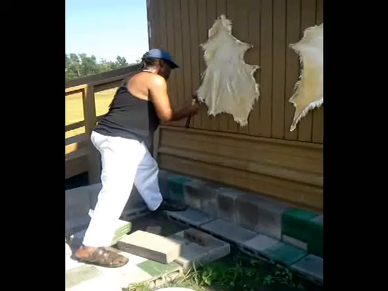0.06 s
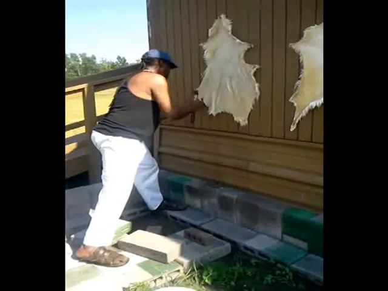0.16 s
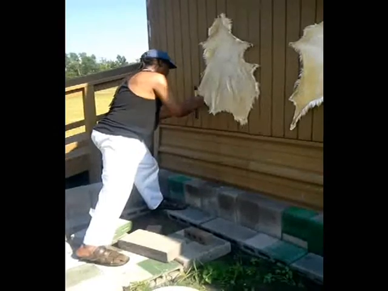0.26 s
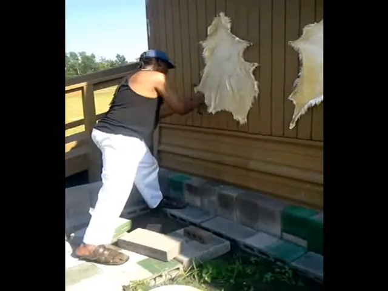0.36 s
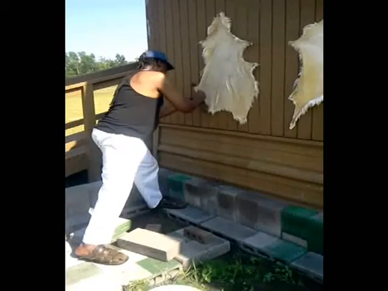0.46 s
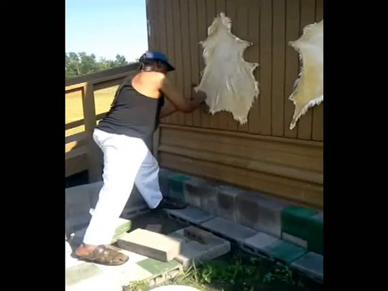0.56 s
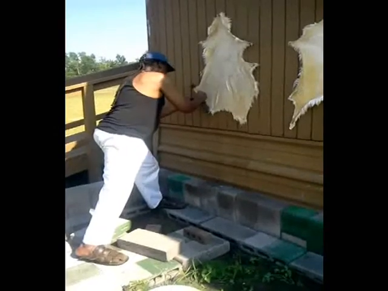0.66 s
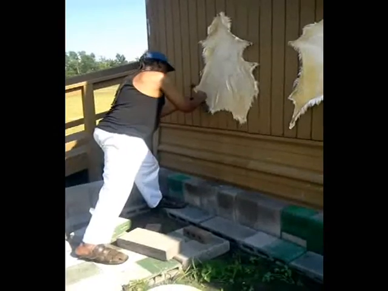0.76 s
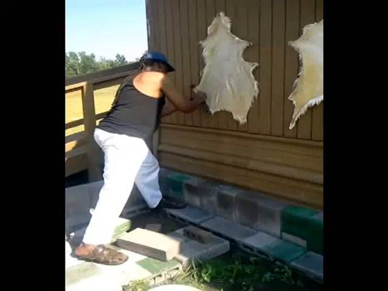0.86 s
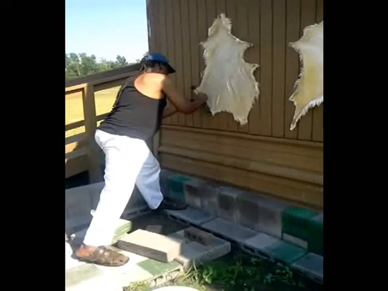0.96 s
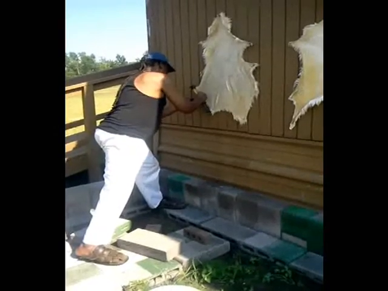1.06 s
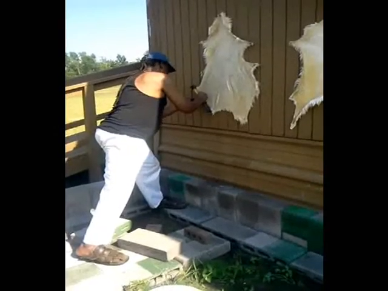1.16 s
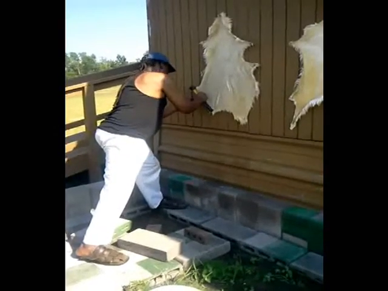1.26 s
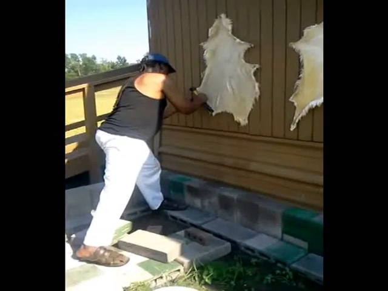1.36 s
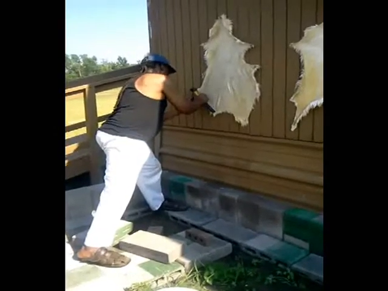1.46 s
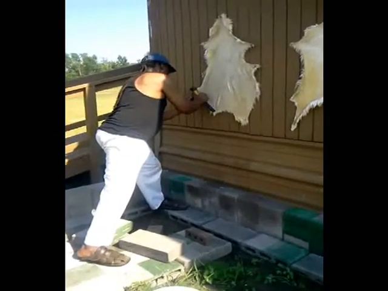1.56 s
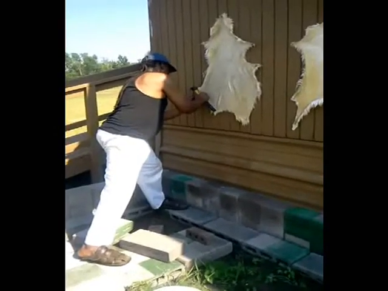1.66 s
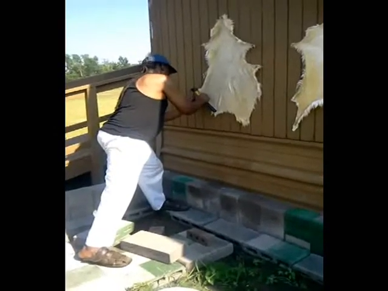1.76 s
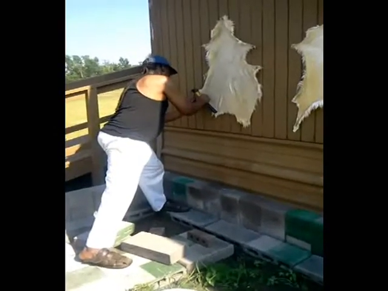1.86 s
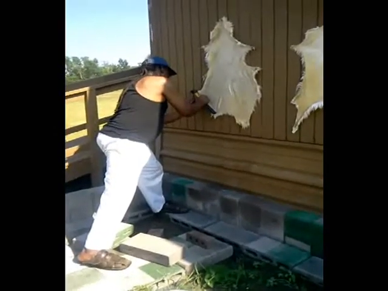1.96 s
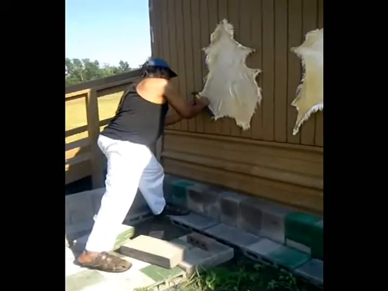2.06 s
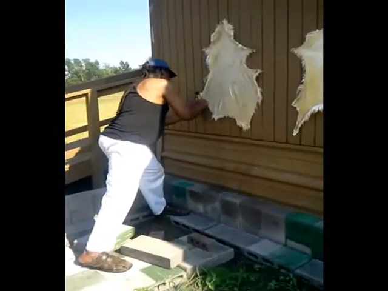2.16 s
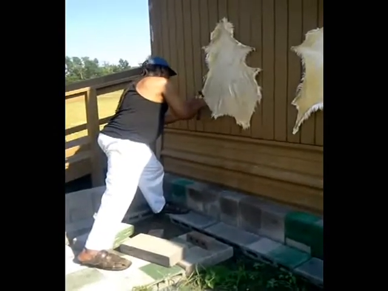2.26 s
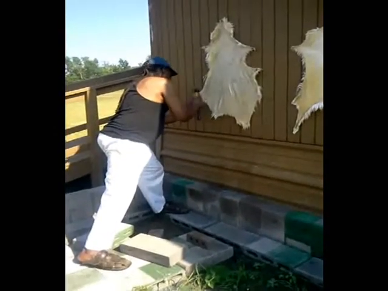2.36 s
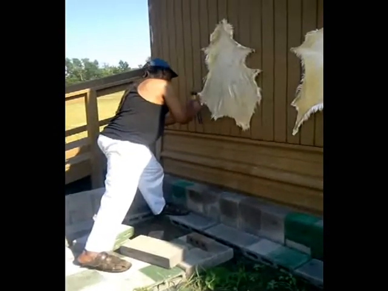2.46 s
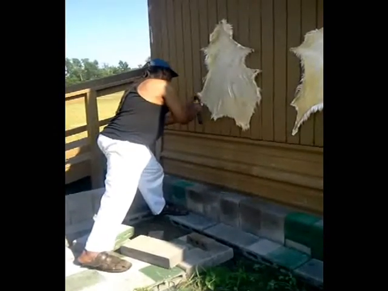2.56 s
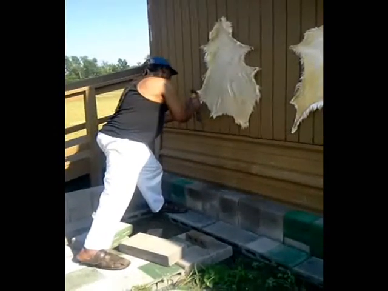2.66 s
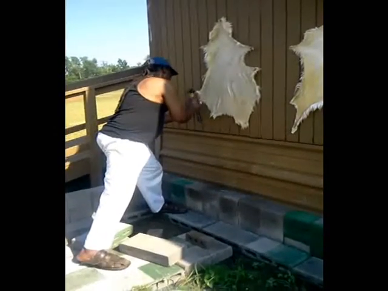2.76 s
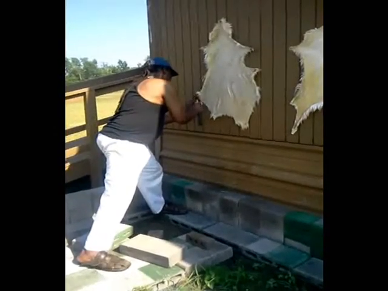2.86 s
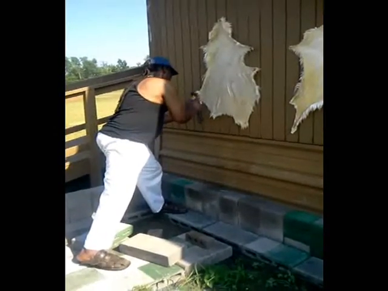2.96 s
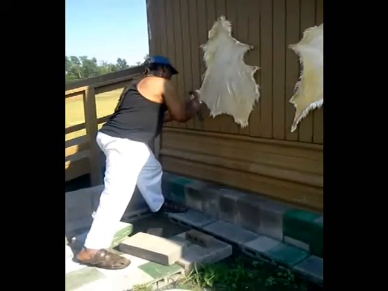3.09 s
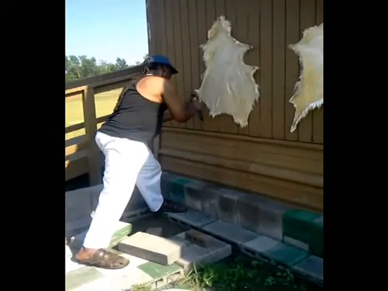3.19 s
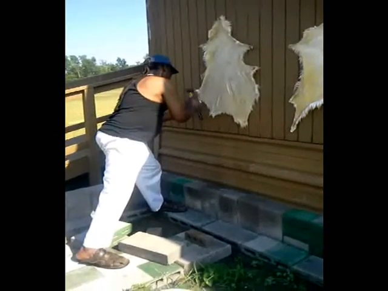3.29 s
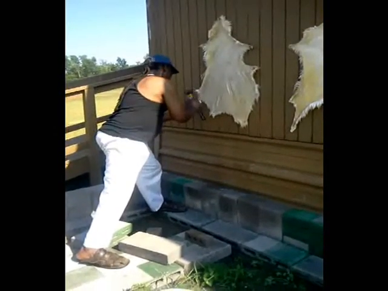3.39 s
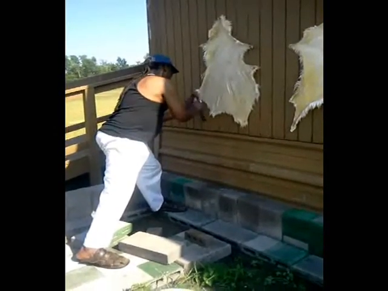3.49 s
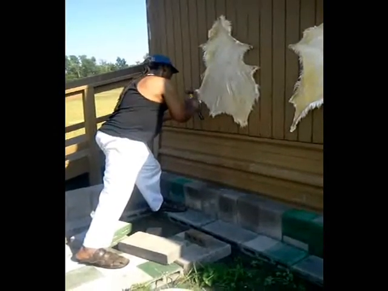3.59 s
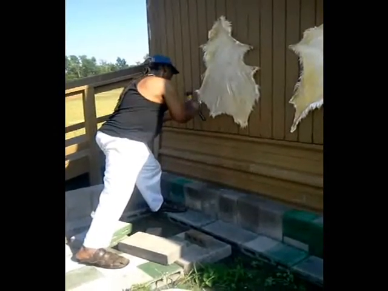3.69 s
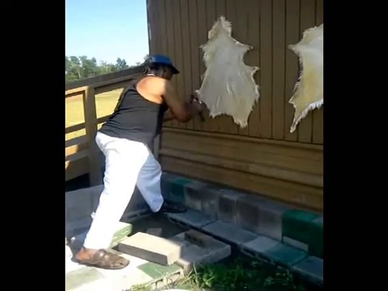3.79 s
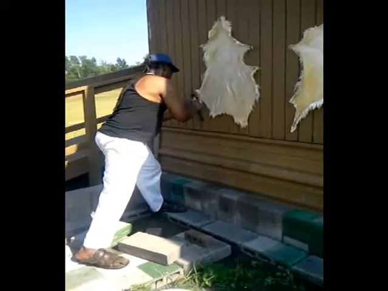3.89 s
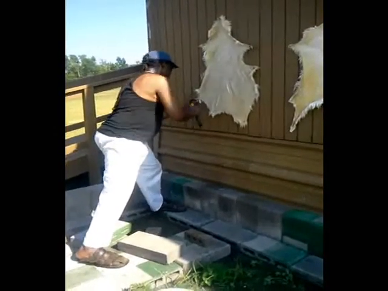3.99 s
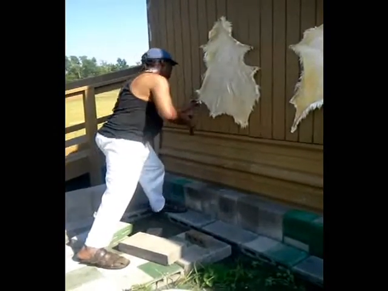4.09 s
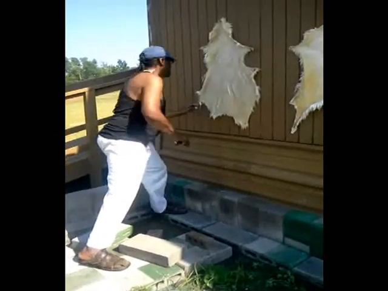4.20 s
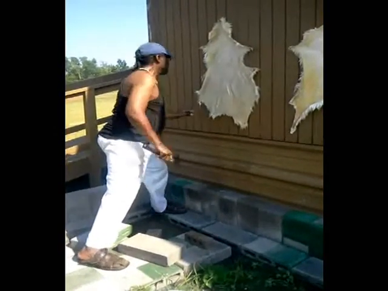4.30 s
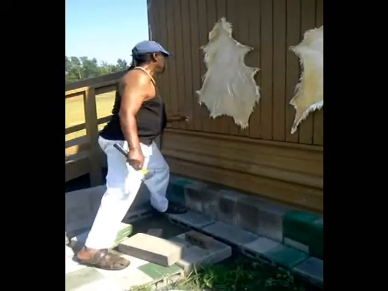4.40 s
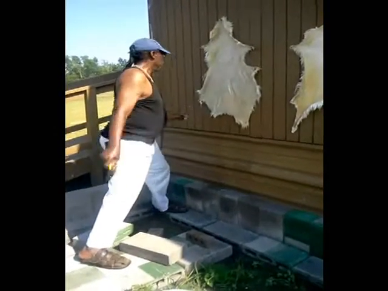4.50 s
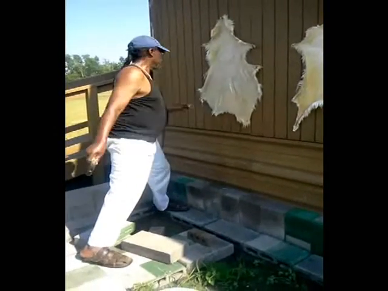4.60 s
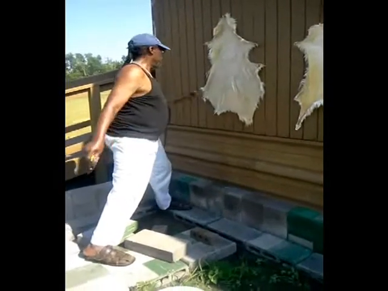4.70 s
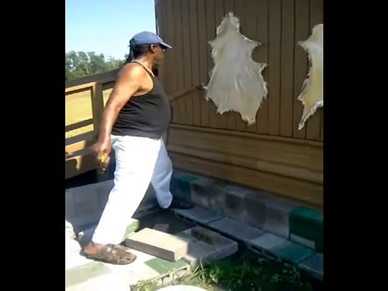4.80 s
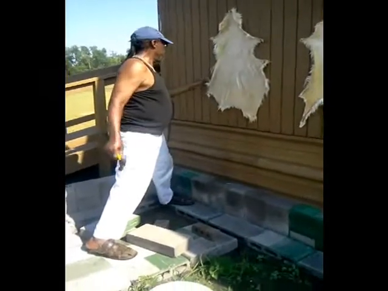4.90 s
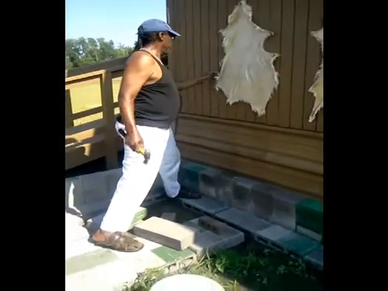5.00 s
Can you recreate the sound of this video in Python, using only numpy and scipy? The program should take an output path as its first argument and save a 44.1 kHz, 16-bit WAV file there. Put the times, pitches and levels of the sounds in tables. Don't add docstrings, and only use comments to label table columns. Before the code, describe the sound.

Outdoors, two dry ticks, then a muffled hammer blow and four hard, overloaded cracks on a hollow wooden wall, with faint birds and breeze.

```python
import sys
import numpy as np
from scipy import signal
from scipy.fft import rfft, irfft
from scipy.io import wavfile

SR = 44100
rng = np.random.default_rng(int(sys.argv[2]) if len(sys.argv) > 2 else 0)


def invert_db(x):
    u = np.asarray(x, float) / 20
    return 10 ** u


def store_pcm(level_fs):
    pcm = np.round(np.clip(level_fs, -1, 1) * 32767).astype(np.int16)
    wavfile.write(sys.argv[1], SR, np.atleast_2d(pcm).T)


N = 222518
TAIL = 2 ** 15


def rms_one(x):
    return x / np.sqrt(np.mean(x ** 2) + 1e-20)


def at_hz(points, hz, axis=1):
    points = np.array(points)
    return np.interp(np.log(hz), np.log(points[:, 0]), points[:, axis])


def add(out, start_s, sound):
    at = round(start_s * SR)
    out[at:at + len(sound)] += sound[:N - at]


def butter(x, order, hz, kind):
    return signal.sosfilt(signal.butter(order, hz, kind, fs=SR, output="sos"), x)


def split(x, hz):
    low = signal.sosfiltfilt(signal.butter(4, hz, fs=SR, output="sos"), x)
    return low, x - low


def drift(rate_hz):
    r = np.exp(-80 * np.pi * rate_hz / SR)
    slow = signal.lfilter([1], [1, -2 * r, r * r], rng.standard_normal(N // 40 + 2002))[2000:]
    return np.interp(np.arange(N) / 40, np.arange(len(slow)), rms_one(slow))


def bands(white, low_hz, high_hz, count, run_in=0):
    edges = np.geomspace(low_hz, high_hz, count + 1)
    for k, (low, high) in enumerate(zip(edges, edges[1:])):
        yield np.sqrt(low * high), butter(white[k % 2], 2, [low, high], "band")[run_in:]


def modes(table, spread_db):
    t = np.arange(TAIL) / SR
    hz, strength, t60 = np.transpose(table)[:, :, None]
    chance = invert_db(spread_db * rng.standard_normal(hz.shape))
    return np.sum(chance * strength * invert_db(-60 * t / t60) * np.sin(2 * np.pi * hz * t), axis=0)


def smear(before, after, low_hz, high_hz):
    noise = butter(rng.standard_normal(before + after), 2, [low_hz, high_hz], "band")
    return rms_one(noise) * np.sin(np.linspace(0, np.pi, before + after)) ** .3


# start_s, level_db, rattle_db, hide_share (1 = fully through the hide)
BLOWS = [
    (2.637, -4, -23, 0.93),
    (2.9290, 0.5, -13, 0.08),
    (3.228, 0, -7.5, 0.043),
    (3.5298, 0.5, -7.5, 0.011),
    (3.8336, 2.5, -6.5, 0.023),
]
# pitch_hz, signed strength, t60_s
KNOCK = [(401, 1, 0.017), (483.3, -0.096, 0.3), (632, 0.33, 0.04), (930, -0.45, 0.012), (989, -0.64, 0.02),
         (1090, 0.17, 0.12), (1358, 0.66, 0.015), (1448, -0.091, 0.14), (1830, 0.4, 0.09),
         (1995, -0.42, 0.03), (2080, 0.18, 0.054), (2673, 0.78, 0.025), (3330, -0.073, 0.044),
         (3694, -0.69, 0.053), (3780, -0.63, 0.029), (4060, -0.71, 0.049), (4130, 0.75, 0.052),
         (4700, -0.84, .04)]
# pitch_hz, signed strength, t60_s
BOOM = [(75, -0.12, 0.28), (103.9, -0.22, 0.29), (132.6, 0.38, 0.15), (172.8, 1.5, .1), (168, -1.4, 0.043),
        (269, 0.51, 0.13), (339.5, 0.51, 0.075)]
# pitch_hz, signed strength, t60_s
MUFFLED = [(75.4, -0.49, 0.1), (104.5, -0.236, 0.3), (130, 0.48, 0.16), (176.3, 0.7, 0.16),
           (270, 0.4, 0.12), (328, 0.71, 0.067)]
# pitch_hz, signed strength, t60_s
BOARDS = [(422, .035, .55), (512.7, .025, .55), (846, .022, .7), (930, .02, .6)]
# pitch_hz, signed strength, t60_s
CLAP = [(260, -0.38, 0.018), (401, -0.86, 0.037), (513, -0.14, 0.034), (834, 0.12, 0.06),
        (970, -0.3, 0.013), (1342, 0.14, 0.047)]
CONTACT_MS, HIDE_MS = 0.12, 0.23
FLUTTER_DB, FLUTTER_FOLLOWS = 1.74, 0.56
CRACK_TOP_DB = -3.5


def hammer():
    out, t = np.zeros(N), np.arange(TAIL) / SR
    near, clap_echo, crack_echo = yard()
    yard_noise = rng.standard_normal((2, TAIL))
    for start_s, level_db, rattle_db, hide in BLOWS:
        contact_ms = CONTACT_MS + HIDE_MS * hide
        push = t[:600] * np.exp(-t[:600] * 1000 / contact_ms)
        edge = np.exp(-t[:600] / .00008)
        push = push / push.sum() + 0.23 * edge / edge.sum()

        wall = MUFFLED if hide > .5 else BOOM
        bodies = (KNOCK, wall + BOARDS, CLAP)
        knock, boom, clap = [np.convolve(modes(body, spread_db=.9), push)[:TAIL] for body in bodies]
        knock = knock * invert_db(-6 * hide)
        boom = boom * (1 - np.exp(-t / 0.0036))

        hiss = invert_db(rattle_db) * rattle(0.76 * yard_noise + 0.6 * rng.standard_normal((2, TAIL)))
        low, top = split(butter(hiss, 2, 2350, "high"), 7000)
        bright = low + invert_db(CRACK_TOP_DB) * top
        crack = 1.7 * bright * np.exp(-(t / 0.0036) ** 2)

        flutter = rfft(clap, 2 * TAIL) * clap_echo + rfft(crack, 2 * TAIL) * crack_echo
        flutter_db = FLUTTER_DB + FLUTTER_FOLLOWS * rattle_db
        heard = irfft(rfft(knock, 2 * TAIL) * near + invert_db(flutter_db) * flutter)[:TAIL]
        add(out, start_s, invert_db(level_db) * (boom + heard) + hiss)
        add(out, start_s - 240 / SR, invert_db(rattle_db - 24.5) * smear(240, 200, 900, 7000))
    return out


# pitch_hz, early_level_db (per Hz), early_t60_s, late_level_db, late_t60_s
RATTLE = [(180, -24, .12, -14, 0.42), (350, 3, 0.083, -8, 0.18), (670, 5.5, 0.095, -24, 1),
          (1500, 0, 0.08, -18.5, 0.51), (2770, 1, 0.058, -13.5, 0.37), (3860, 3, 0.16, -21, 0.62),
          (5170, 2, 0.039, -24.5, 0.47), (5940, -24, 0.072, -28, .25), (6660, -3.5, 0.045, -24, 0.29),
          (7600, -19.5, 0.25, -23, 0.42), (9900, -26.5, 0.084, -18.5, 0.83), (13500, -20, 0.065, -20, 0.46),
          (15500, -20.5, 0.17, -18, 0.29)]


def rattle(white):
    t, out = np.arange(TAIL) / SR, 0
    for hz, band in bands(white, 150, 16400, count=23):
        early = invert_db(-60 * t / at_hz(RATTLE, hz, axis=2))
        late = invert_db(at_hz(RATTLE, hz, axis=3) - 60 * t / at_hz(RATTLE, hz, axis=4))
        out = out + invert_db(at_hz(RATTLE, hz)) * band * (early + late)
    return 2.6 * out * (1 - np.exp(-t / 0.0015))


# delay_ms, signed strength
NEAR = [(2.9, 0.82), (6.0, 0.35), (9.0, 0.11), (13.5, -0.28), (22.0, -0.047), (35.0, -0.051)]
# pitch_hz, level_db
ROUND_LOSS = [(60, -7), (250, -3.5), (430, -4), (540, -2.5), (690, -7.5), (880, -1.5), (1050, -2.5),
              (1300, -2.5), (1700, -3.5), (3000, -4.5), (5000, -7.5), (8000, -9), (12000, -4.5)]
ROUND_MS, BACK_MS, FRONT_MS = 30.9, 18.6, 30.2
BACK_DB, BACK_CRACK_DB, FRONT_CRACK_DB = -6, 3.5, -5
SCATTER_MS, SCATTER = 2.1, .07


def yard():
    hz = np.maximum(np.fft.rfftfreq(2 * TAIL, 1 / SR), 1)

    def delay(ms):
        return np.exp(-2j * np.pi * hz * ms / 1000)

    near = 1 + sum(strength * delay(ms) for ms, strength in NEAR)
    loss = np.minimum(invert_db(at_hz(ROUND_LOSS, hz)), .9)
    lag = delay(SCATTER_MS)
    loss = loss * (SCATTER + lag) / (1 + SCATTER * lag) / lag
    back, front = [loss * delay(ms) / (1 - loss * delay(ROUND_MS)) for ms in (BACK_MS, FRONT_MS)]
    clap_echo = invert_db(BACK_DB) * back + front
    crack_echo = invert_db(BACK_CRACK_DB) * back + invert_db(FRONT_CRACK_DB) * front
    return near, clap_echo, crack_echo


# start_s, level_db (peak), edge_db, smear_db
TICKS = [
    (1.3825, -27, -30, -45),
    (2.14043, 1, -30, -30),
]
# pitch_hz, signed strength, t60_s
TICK_STEEL = [(3350, .26, .005), (6900, .04, 0.0038), (10000, .075, 0.0026), (15000, .1, .003)]
TICK_HZ, TICK_TURNS, TICK_DROP_MS = 1520, 0.44, .22
TICK_SWELL_MS, TICK_DECAY_MS, SMEAR_MS = 0.17, .4, 5.5


def ticks():
    out, ms = np.zeros(N), np.arange(400) / SR * 1000
    half = round(SMEAR_MS * SR / 1000)
    turns = TICK_HZ * ms / 1000 + TICK_TURNS * (1 - np.exp(-ms / TICK_DROP_MS))
    decay = np.exp(-np.maximum(ms - TICK_SWELL_MS, 0) / TICK_DECAY_MS)
    ring = np.clip(ms / TICK_SWELL_MS, 0, 1) * decay * np.sin(2 * np.pi * turns)
    for start_s, peak_db, edge_db, smear_db in TICKS:
        edge = rng.standard_normal(len(ms)) * np.exp(-((ms - .3) / 0.22) ** 2)
        steel = modes(TICK_STEEL, spread_db=3.0)[:len(ms)]
        add(out, start_s, invert_db(peak_db) * (invert_db(edge_db) * edge + steel - ring))
        add(out, start_s - half / SR, invert_db(peak_db + smear_db) * smear(half, half, 1100, 3300))
    return out


def dip(x):
    centre_hz, width_hz, share = 6050, 950, 0.72
    return x - share * signal.lfilter(*signal.iirpeak(centre_hz, centre_hz / width_hz, fs=SR), x)


# start_s, level_db (peak), pitch_hz, t60_s
THUDS = [
    (4.254, -41, 260, 0.22),
    (4.305, -36, 252, 0.24),
]


def thuds():
    out, t = np.zeros(N), np.arange(TAIL) / SR
    for start_s, peak_db, hz, t60 in THUDS:
        ring = modes([(hz, 1, t60)], spread_db=1.5)
        add(out, start_s, invert_db(peak_db) * ring * (1 - np.exp(-t / 0.0047)))
    return out


# start_s, length_s, pitch_hz (at start), level_db
NOTES = [(0.0, 0.039, 4130, -50), (.187, .06, 4100, -58), (.25, 0.054, 4550, -51.5), (.295, .09, 4060, -56),
         (.3, 0.083, 3810, -58), (.34, 0.089, 4570, -53), (.35, .13, 6040, -56), (.53, .13, 3560, -55),
         (.581, 0.077, 3930, -56), (.7, .05, 4670, -53), (.72, 0.079, 3860, -48.5), (.75, .09, 3510, -52),
         (.77, 0.064, 4670, -54), (.84, 0.073, 3780, -49.5), (.86, 0.064, 3550, -54),
         (1.14, .04, 4740, -56), (1.154, 0.059, 3480, -59), (1.163, .04, 4370, -52),
         (1.212, .05, 4660, -57), (1.383, 0.064, 3780, -48), (1.57, .08, 4590, -52),
         (1.69, 0.029, 3760, -51), (2.43, .12, 4570, -54), (4.03, .1, 4690, -55), (4.19, 0.12, 4700, -53),
         (4.25, .1, 5260, -61), (4.34, .07, 4605, -50)]
# start_s, length_s, pitch_hz (at start), level_db
SLURS = [
    (.959, 0.086, 3780, -48),
    (1.072, 0.076, 3690, -51),
]
NOTE_SAG_HZ_PER_S, SLUR_FALL_HZ_PER_S = 430, 3100
TREES_S, TREES_DB = 0.021, -5.5


def birds():
    out, waver, fading = np.zeros(N), drift(60), invert_db(1.5 * drift(40))
    for calls, fall in ((NOTES, NOTE_SAG_HZ_PER_S), (SLURS, SLUR_FALL_HZ_PER_S)):
        for start_s, length_s, start_hz, level_db in calls:
            along = np.linspace(0, 1, round(length_s * SR))
            hz = start_hz - fall * length_s * along + 16.0 * waver[round(start_s * SR):][:len(along)]
            whistle = np.sin(2 * np.pi * np.cumsum(hz) / SR)
            mirror = np.sin(2 * np.pi * np.cumsum(12150 - hz) / SR)
            swell = np.sin(np.pi * along) ** .3
            add(out, start_s, invert_db(level_db - 1.5) * swell * (whistle + 0.079 * mirror))
    lag = np.arange(TAIL // 8) / SR
    trees = rng.standard_normal(len(lag)) * np.exp(-lag / TREES_S)
    blurred = signal.fftconvolve(out, trees / np.linalg.norm(trees))[:N]
    return out * fading + invert_db(TREES_DB) * blurred


# pitch_hz, width_hz, level_db (at mean breeze)
CHORUS = [(3760, 120, -66), (4626, 170, -63.5), (5280, 200, -65.5)]
CHORUS_THROB_DB = 2.5


def chorus():
    out = np.zeros(N)
    for hz, width_hz, level_db in CHORUS:
        b, a = signal.iirpeak(hz, hz / width_hz, fs=SR)
        line = signal.lfilter(b, a, signal.lfilter(b, a, rng.standard_normal(N)))
        out += invert_db(level_db + CHORUS_THROB_DB * drift(4.3)) * rms_one(line)
    return out


# start_s, level_db
GUST = [(0.0, -50.5), (.49, -48.5), (1.0, -47.5), (1.55, -48), (1.98, -51.5), (2.55, -48), (3.4, -49.5),
        (4.1, -46), (4.5, -48.5), (5.05, -50.5)]


def gusts():
    return np.interp(np.arange(N) / SR, *np.transpose(GUST))


def breeze(spectrum, low_hz, high_hz, patchy_db, count):
    together, out = drift(0.61), 0
    white = rng.standard_normal((2, N + 9000))
    for hz, band in bands(white, low_hz, high_hz, count, run_in=9000):
        swell_db = patchy_db * (.4 * together + drift(8))
        out = out + invert_db(at_hz(spectrum, hz) + swell_db) * band
    return rms_one(out)


# pitch_hz, level_db (per Hz)
LEAVES = [(400, -42), (700, -6), (1500, -5.5), (2600, -7), (3700, -4), (4700, -3.5), (5700, -7), (7400, -9),
          (8200, -19), (9800, -21.5), (13000, -18), (15500, -15.5)]
STEP_HZ, STEP_DB = 7700, -6.5


def leaves(gust_db):
    dull, bright = split(breeze(LEAVES, 424, 15470, patchy_db=1.0, count=26), STEP_HZ)
    return invert_db(gust_db) * (dull + invert_db(STEP_DB) * bright)


# pitch_hz, level_db (per Hz)
RUMBLE = [(12, -35), (20, 5), (156, -2), (195, -7.5), (315, -4.5), (369, -20.5), (406, -6), (665, -16),
          (900, -43), (1170, -46), (1980, -120)]
RUMBLE_DB, RUMBLE_FOLLOWS = -50, .6
NEARS_S, NEARS_TAKES_S = 2.36, 0.32
TRAFFIC_HZ, NEARS_DB, DEEP_NEARS_DB = 111, 5.5, 3


def rumble(gust_db):
    nearness = .5 * (1 + np.tanh((np.arange(N) / SR - NEARS_S) / NEARS_TAKES_S))
    deep, traffic = split(breeze(RUMBLE, 18, 900, patchy_db=1.2, count=12), TRAFFIC_HZ)
    swelling = invert_db(DEEP_NEARS_DB * nearness) * deep + invert_db(NEARS_DB * nearness) * traffic
    return invert_db(RUMBLE_DB + RUMBLE_FOLLOWS * (gust_db - gust_db.mean())) * swelling


def scene():
    gust_db = gusts()
    close = dip(hammer() + ticks()) + thuds()
    far = birds() + invert_db(gust_db - gust_db.mean()) * chorus() + leaves(gust_db) + rumble(gust_db)
    return (close + far)[None]


def roll_off(x):
    return signal.sosfilt(signal.butter(12, 16450, fs=SR, output="sos"), x)


OVERLOAD, HARDNESS = .97, 8.0
MIC_LOW_HZ, CUTOFF_HZ = 54.4, 15830


def record(dry):
    heard = butter(dry, 1, MIC_LOW_HZ, "high")
    flat = heard / (1 + np.abs(heard / OVERLOAD) ** HARDNESS) ** (1 / HARDNESS)
    cut = signal.sosfilt(signal.ellip(8, .5, 24, CUTOFF_HZ, fs=SR, output="sos"), flat)
    return roll_off(cut)


dry = scene()
out = record(dry)
store_pcm(out)
```